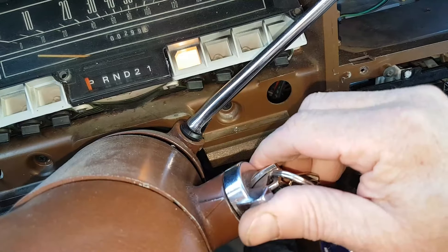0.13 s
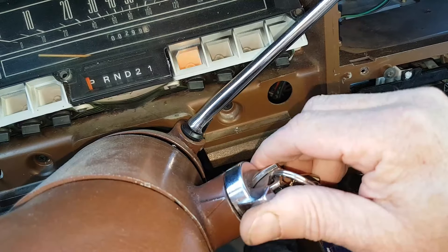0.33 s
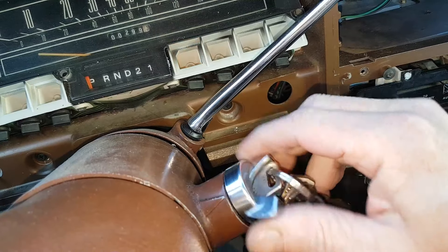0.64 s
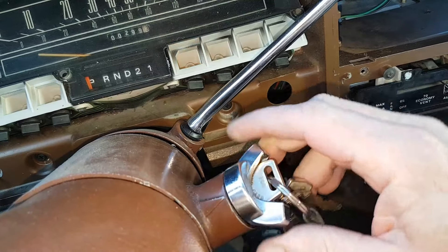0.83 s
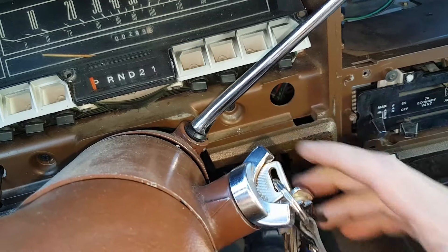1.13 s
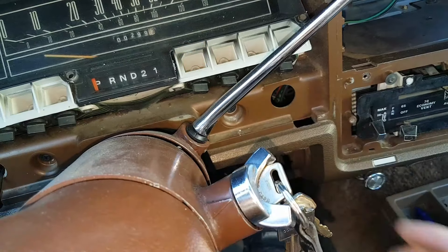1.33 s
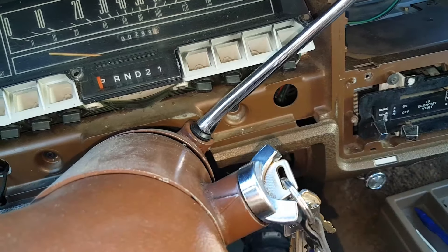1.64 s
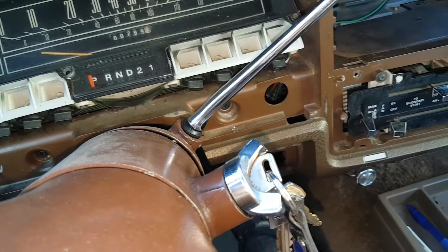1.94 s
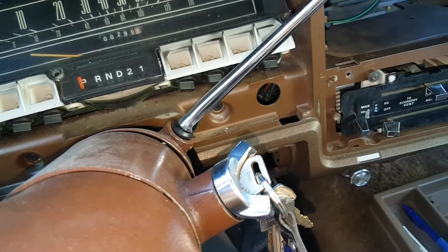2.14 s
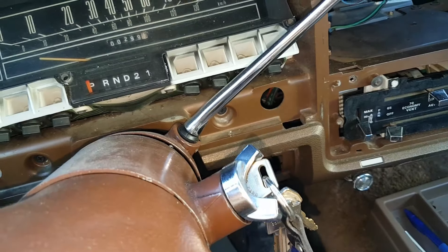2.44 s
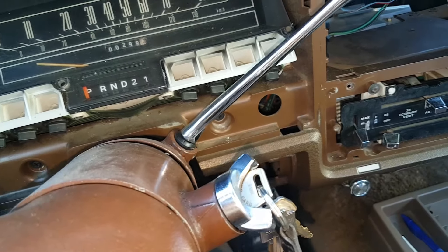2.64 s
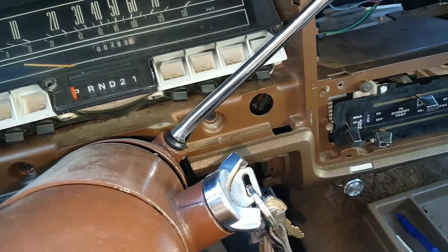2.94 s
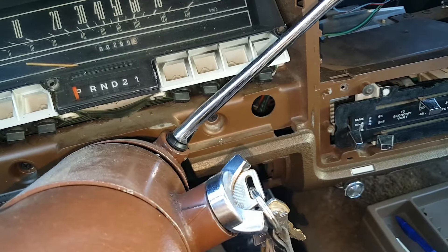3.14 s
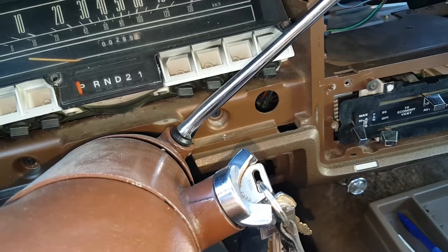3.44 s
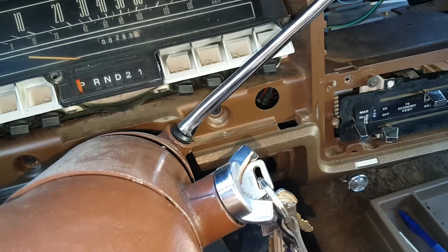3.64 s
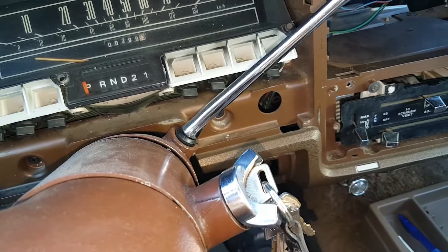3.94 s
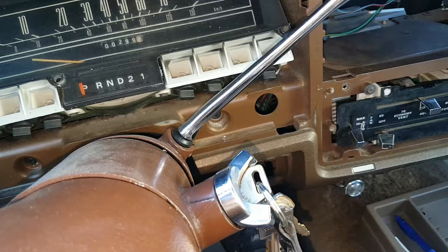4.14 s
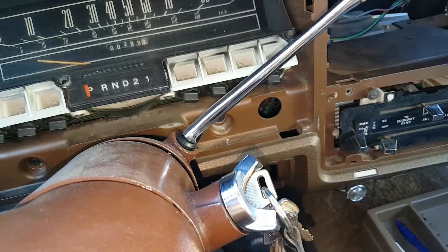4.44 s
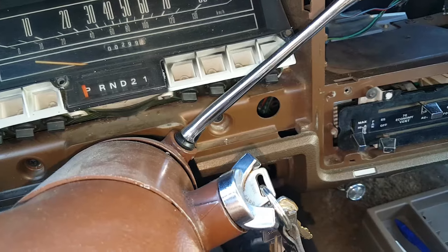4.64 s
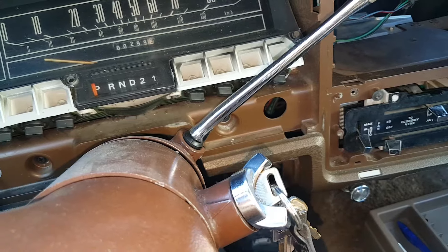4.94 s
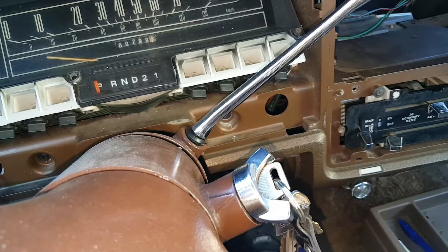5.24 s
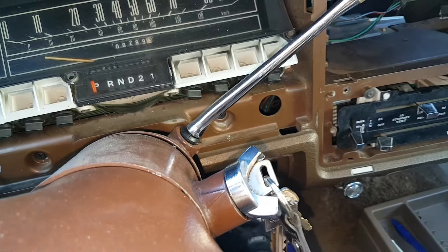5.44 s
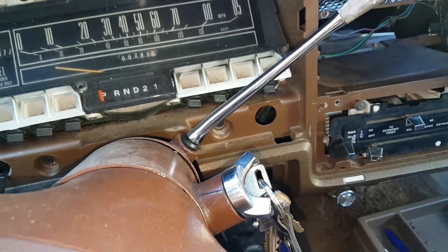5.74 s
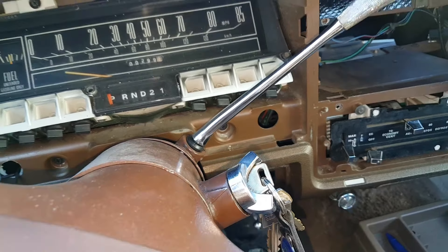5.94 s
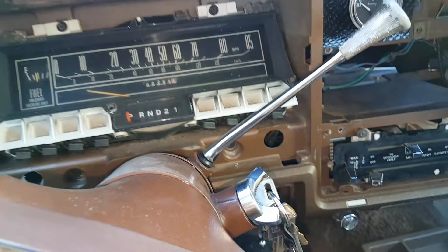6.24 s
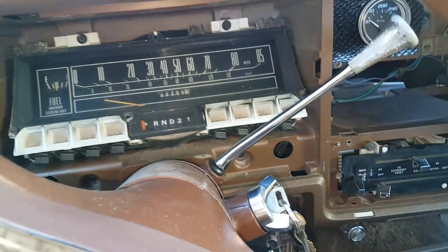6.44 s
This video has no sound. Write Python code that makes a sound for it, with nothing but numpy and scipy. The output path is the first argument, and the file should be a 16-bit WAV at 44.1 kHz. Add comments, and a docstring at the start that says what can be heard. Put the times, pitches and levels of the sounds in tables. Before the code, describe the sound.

Faint cabin air and hum, then a gear crash and grinding, whining starter. The large engine fires, the starter whirs down, and the revs flare and fall. Two throttle blips swell into low, booming growls, each dropping away, before a loping idle remains. Pedal creaks, metallic ticks and light rattles sit close to the stereo microphone inside the resonant car interior.

```python
"""A clunk and a grinding starter, then an old V8 catches, is blipped twice and settles into a loping idle.
Heard from the driver's seat: exhaust lines and uneven firing pulses boom through cabin resonances, shaped
noise makes the roar, the intake hiss and the gear grind, and short ringing bursts tick from pedal, keys and trim.
Faint air and an electric hum lie behind it all; two microphone ports hear it, the left one first."""
import sys
import numpy as np
from scipy.fft import rfft, irfft, next_fast_len
from scipy.io import wavfile
from scipy.ndimage import uniform_filter1d, map_coordinates

SR = 44100
rng = np.random.default_rng(int(sys.argv[2]) if len(sys.argv) > 2 else 0)


def wav_out(sig):
    """Save sig, one row per channel (or a flat mono array), as 16-bit PCM at SR to the path in sys.argv[1]."""
    wavfile.write(sys.argv[1], SR, np.round(np.clip(np.atleast_2d(sig).T, -1, 1) * 32767).astype(np.int16))


N = 291060  # length [samples]


def amp(db):
    """Gain of a level in dB."""
    return 10 ** (np.asarray(db) / 20)


def unit(x):
    """x at rms 1."""
    return x / np.sqrt(np.mean(x ** 2) + 1e-20)


def along(points, hz):
    """A curve through (Hz, value) points on a log frequency axis."""
    f, v = np.transpose(points)
    return np.interp(np.log(hz + 1), np.log(f + 1), v)


def curves(rows):
    """One value per sample for each column, and a gate that is open while the table runs."""
    s, *cols = np.transpose(rows)
    t = np.arange(N) / SR
    to_end = s[-1] - t + (s[-1] > t[-1] - .05)  # a table that lasts to the end does not close
    gate = np.clip(np.minimum(t - s[0], to_end) / .02, 0, 1)
    return np.array([np.interp(t, s, c) for c in cols]), gate


def wobble(rate):
    """A smooth random curve, rate knots a second."""
    coarse = np.arange(0, N + 32, 32)
    knots = rng.standard_normal(int(N * rate / SR) + 4)
    return np.interp(np.arange(N), coarse, map_coordinates(knots, [coarse * rate / SR]))


def swell(start, end, db, rise_s, fall_s):
    """A gain that holds db from start to end; it slopes 60 dB in rise_s before and in fall_s after."""
    t = np.arange(N) / SR
    return amp(db - 60 * np.clip(start - t, 0, None) / rise_s - 60 * np.clip(t - end, 0, None) / fall_s)


def filtered(x, response):
    """x times a complex response of frequency."""
    m = next_fast_len(N + SR // 2)
    return irfft(rfft(x, m) * response(np.fft.rfftfreq(m, 1 / SR)), m)[..., :N]


def modes(table):
    """Causal response of a set of resonances (Hz, width Hz, dB) of alternating sign."""
    def response(f):
        return sum((-1) ** k * amp(db) * 1j * f * w / (c * c - f * f + 1j * f * w)
                   for k, (c, w, db) in enumerate(table))
    return response


def noise(spectrum=None):
    """A pair of unrelated noises of rms 1, white or coloured."""
    pair = rng.standard_normal((2, N))
    return pair if spectrum is None else unit(filtered(pair, lambda hz: amp(along(spectrum, hz))))


def engine():
    """Firing rate and its acceleration drive the lines, fan, boom, roar and hiss; an air leak stays steady."""
    # the run of the engine: (time [s], firing rate [Hz], mechanical roar [dB before its final trim])
    run = [(0.5, 24.04, -45), (0.63, 30.83, -34.5), (0.69, 35, -29), (0.76, 40.55, -38), (0.88, 48, -35),
           (0.98, 49.1, -37.5), (1.1, 45.6, -37), (1.34, 32.65, -41), (1.5, 31.5, -42), (1.75, 26.5, -44.5),
           (2.0, 28, -41.5), (2.17, 33.8, -45.5), (2.28, 49.1, -37.5), (2.43, 90.5, -30.5),
           (2.55, 117.6, -29.5), (2.64, 131.1, -28), (2.71, 130.5, -26), (2.85, 111.5, -32.5),
           (3.0, 90.3, -35), (3.08, 83.8, -39.5), (3.38, 43.76, -43), (3.54, 35.07, -46),
           (3.68, 45.89, -42.5), (3.85, 88.78, -34), (3.96, 113.9, -30.5), (4.01, 118.8, -28.5),
           (4.09, 116.6, -30.5), (4.27, 91.66, -34.5), (4.38, 81, -37), (4.53, 61.9, -40.5),
           (4.7, 42.52, -43), (4.9, 32.92, -45), (5.1, 28.39, -47.5), (5.3, 26.46, -50), (5.76, 30.25, -43),
           (5.96, 34.8, -42.5), (6.2, 36.8, -42.5), (6.6, 33.44, -42)]
    # deep boom as the engine lopes: (time [s], level change [dB])
    lope = [(.68, 1.5), (1.3, 1), (1.53, -3), (1.62, 2), (1.77, -8), (2.04, 0), (2.1, -7), (2.2, 0),
            (2.8, 0), (2.86, -6), (2.95, 1), (3.21, -4), (3.32, 4), (3.42, -3), (3.62, 0), (4.02, 1),
            (4.08, -8), (4.13, 1), (4.19, -5), (4.29, 3), (4.43, -2), (4.69, 0), (4.73, -5), (4.85, 0),
            (5.26, 1), (5.31, -5), (5.5, 0), (6.13, 1), (6.17, -5), (6.3, 0), (6.6, 0)]
    full_pull_hz_per_s, pull_window_s = 209, 0.057  # acceleration that means an open throttle; averaging
    caught_s, catch_rise_s = 0.682, 0.56  # steady firing from here on; its rise over 60 dB
    (firing_hz, roar_db), running = curves(run)
    revved = np.clip((firing_hz - 45) / 60, 0, 1)
    acceleration = uniform_filter1d(np.gradient(firing_hz) * SR, round(pull_window_s * SR))
    pull = np.clip(acceleration / full_pull_hz_per_s, 0, 1)
    lope_db = curves(lope)[0][0]
    boom_level_db = boom_db(roar_db, pull, lope_db)
    fired = np.cumsum(firing_hz) / SR  # firings so far
    lines = exhaust_lines(firing_hz, fired, roar_db, pull, lope_db)
    fan = revved ** 2 * engine_line(2.87, -36, fired)  # cooling fan
    boom = firing_boom(firing_hz, fired, revved, boom_level_db)
    low = swell(caught_s, N / SR, 0, catch_rise_s, 1) * running * (lines + fan + boom)
    roar = mechanical_roar(fired, revved, roar_db)
    hiss = intake_hiss(roar_db, pull, revved)
    spread_low = np.array([low, 0.31 * running * np.roll(low, 900)])  # a weaker copy 20 ms later for width
    return spread_low + running * (amp(-1.5) * roar + hiss + air_leak())


def engine_line(k, db, fired):
    """A tone at k times the firing rate; no two firings burn alike, so its level and phase flutter."""
    gain = np.sqrt(2) * amp(db + 1.1 * min(k, 2) * wobble(18))  # the high ones flutter most
    return gain * np.sin(k * (2 * np.pi * fired + .13 * wobble(12)))


def exhaust_lines(firing_hz, fired, roar_db, pull, lope_db):
    """Multiples of the firing rate, and the fractions that uneven banks sound, pass into the cabin."""
    # lines of the exhaust: multiples of the firing rate [1]
    multiples = np.array([5.5, 5, 6, 7, 8, 9, 10, 11, 12, 13, 14, 15, 16, 19, 21, 24]) / 8
    # strength of each multiple at idle [dB before the path]
    idle_db = [-50, -44, -49, -51, -25, -48, -50, -48, -45, -48, -40, -40, -28, -32, -28, -27]
    # under open throttle and on the overrun: a row per blip, a column per multiple [dB before growth and path]
    open_db = [
        [-40, -25, -5.5, -28, -25, -11.5, -4, -24, -24, -28, -28, -28, -15, -32, -31.5, -30],
        [-6, -26, -24, -28, -16, -7, -22, -22, -28, -30, -28, -28, -16, -34, -31.5, -30],
    ]
    overrun_db = [
        [-40, -11, -28, -14, -14, -22, -24, -24, -26, -22, -26, -24, -15, -32, -32, -30],
        [-15, -24, -26, -7, -13, -19, -18, -24, -24, -22, -22, -22, -14.5, -32, -32, -30],
    ]
    # path of the lines into the cabin: (frequency [Hz], width [Hz], gain [dB])
    path = [(30.8, 7, -2), (80.5, 15, 0.5), (131, 20, -1.5), (173, 30, -4), (252, 48, -3)]
    second_blip_s, lines_grow = 3.55, 0.77  # growth off idle [dB per dB of roar]
    blip = (np.arange(N) / SR > second_blip_s).astype(int)
    off_idle = np.clip((firing_hz - 40) / 28 + 1.07 * pull, 0, 1)
    growth_db = lines_grow * (roar_db - roar_db.max())
    wide_open = np.transpose(open_db)[:, blip]
    shut_off = np.transpose(overrun_db)[:, blip]
    total = 0
    for k, idle, wide, shut in zip(multiples, idle_db, wide_open, shut_off):
        line_db = idle + off_idle * (shut + pull * (wide - shut) + growth_db - idle)
        # only lines between 30 and 150 Hz lope
        deep = np.clip(np.minimum(150 - k * firing_hz, k * firing_hz - 30) / 30, 0, 1)
        total = total + engine_line(k, line_db + lope_db * deep, fired)
    return filtered(total, modes(path))


def boom_db(roar_db, pull, lope_db):
    """The boom grows with the roar and the throttle, lopes, and wanders at random."""
    idle_db, grows, pull_db = -23.5, 0.61, 6  # base [dB]; dB per dB of roar; extra under throttle [dB]
    return idle_db + grows * (roar_db - roar_db[-1]) + pull_db * pull + lope_db + 2.1 * wobble(13)


def firing_boom(firing_hz, fired, revved, level_db):
    """One pulse a firing, of uneven strength, with a little noise excites the cabin resonances."""
    # strength of each firing in the cycle [dB]
    cylinders = [-6, 0, 2, -5.5, -6, -6.5, -5, -3.5]
    # cabin resonances: (frequency [Hz], width [Hz], gain [dB])
    cavity = [(24.4, 11.8, -10.5), (47.8, 11.8, -7.5), (78.8, 12.94, -1), (126, 44.7, -11),
              (164.5, 30.4, -13.5)]
    clean_db = 5  # firings even out at speed, so the boom drops
    at = np.flatnonzero(np.diff(np.floor(fired)))
    sizes = amp(np.resize(cylinders, len(at)) + 2.2 * rng.standard_normal(len(at)))
    pulses = np.zeros(N)
    # most of the even part is taken out: it already sounds in the lines
    pulses[at] = (sizes - 0.87 * sizes.mean()) / np.sqrt(firing_hz[at])
    ringing = unit(filtered(pulses + 0.0063 * noise()[0], modes(cavity)))
    return amp(level_db - 4.5 - clean_db * revved) * ringing


def mechanical_roar(fired, revved, roar_db):
    """Noise that swells once a firing, changes colour with speed and rings block and firewall."""
    # roar at low speed: (frequency [Hz], relative density [dB per Hz])
    slow_spectrum = [(110, -34), (180, 2), (193, -30.5), (225, 0), (381, -20.5), (754, -17), (879, -19),
                     (1760, -21.5), (5000, -40), (6500, -54), (11000, -120)]
    # roar at high speed: (frequency [Hz], relative density [dB per Hz])
    fast_spectrum = [(90, -30), (180, -3.5), (340, -3.5), (480, -16.5), (800, -14.5), (1120, -21),
                     (1690, -24), (5000, -47.5), (6500, -86), (11000, -120)]
    # engine block and firewall: (frequency [Hz], width [Hz], level over the roar [dB])
    block = [(770, 76, 3), (978, 56, 3), (1228, 28, 0.5), (1770, 245, -4.5), (2330, 41, 6), (3010, 65, 2.5)]
    puff = 1 + (.15 + .15 * revved) * np.cos(2 * np.pi * fired) * amp(3 * wobble(40))
    blend = np.sqrt(1 - revved) * noise(slow_spectrum) + amp(4.0) * np.sqrt(revved) * noise(fast_spectrum)
    flutter = amp(.8 * wobble(18))
    return filtered(amp(roar_db) * flutter * blend * puff,
                    lambda hz: 1 + abs(sum(modes([m])(hz) for m in block)))


def intake_hiss(roar_db, pull, revved):
    """Air noise with throttle resonances grows with the roar; a narrow whistle joins as the throttle opens."""
    # intake air: (frequency [Hz], relative density [dB per Hz])
    air_spectrum = [(2350, 9.5), (4000, 1), (4680, -11), (5250, 7), (5900, 4), (6780, 2), (7480, -9),
                    (8910, -2.5), (12000, 2), (15000, 0), (16000, -3)]
    # whistles of the intake: (frequency [Hz], width [Hz], gain [dB])
    throttle = [(1249, 42, 19.5), (6230, 1800, 0), (6900, 400, 4)]
    # the hiss swells: (from [s], to [s], gain [dB])
    gulps = [(0.75, 1.055, -58), (1.97, 2.1, -56), (2.304, 2.56, -45.5), (3.78, 3.93, -48),
             (5.75, 6.601, -61)]
    gulp_rise_s, gulp_fall_s = 0.48, 0.74  # over 60 dB
    hiss_db, hiss_grows = -60.5, 0.21  # base gain [dB]; dB per dB of roar
    whistle_db = -46  # at its strongest, as the throttle cracks open at low speed
    gain = amp(hiss_db + hiss_grows * (roar_db - roar_db[-1]))
    gain = gain + sum(swell(*g, gulp_rise_s, gulp_fall_s) for g in gulps)
    hiss = gain * amp(1.3 * wobble(30)) * (noise(air_spectrum) + filtered(noise(), modes(throttle)))
    whistle = unit(filtered(noise(), modes([(1253, 18, 0)])))
    return hiss + amp(whistle_db) * np.clip(2 * pull, 0, 1) * (1 - revved) ** 2 * whistle


def air_leak():
    """A steady fizz of escaping air, its spectrum rippled by hose echoes."""
    # leaking air: (frequency [Hz], relative density [dB per Hz])
    fizz = [(5290, -34), (9000, -6.5), (9650, -11.5), (10700, -5.5), (11500, -8), (13800, 1.5), (15600, -6),
            (16000, 0.5)]

    def hose(hz):
        return 1 + .25 * np.cos(2 * np.pi * hz * 0.0014) + 0.34 * np.cos(2 * np.pi * hz * 0.0043)
    return amp(-50.5) * filtered(noise(fizz), hose)


def starter():
    """The motor drones, gear teeth grind, the freewheel sizzles as the engine overtakes; then it whirs down."""
    # starter on, off [s]
    crank_s = (0.13, 0.735)
    # the pinion crashes into the ring gear: time [s], crash [dB], sizzle [dB], rise [s], fall [s] over 60 dB
    mesh_s, crash_db, spark_db, rise_s, fall_s = (0.15, -23, -36, 0.12, 0.11)
    # the released motor whirs down: from [s], to [s], level [dB], rise [s], fall [s] over 60 dB
    coast = (0.75, 1.05, -46.5, .05, 2)
    # resonances of the whir: (frequency [Hz], width [Hz], gain [dB])
    whir = [(1400, 60, -2), (1800, 250, 1.5), (2290, 250, -3)]
    on = swell(*crank_s, 0, 0.032, .06)
    drone = motor_drone()
    teeth = noise() * amp(1.1 * wobble(120))

    def broad(hz):
        return amp(-9.5) * (hz > 300) / (1 + (hz / 2500) ** 2)
    whine = gear_whine(teeth)
    grind = amp(-34.5) * unit(whine + filtered(teeth, broad))
    crash_gain = swell(mesh_s, mesh_s, crash_db, rise_s, fall_s)
    crash = crash_gain * unit(filtered(noise(), broad) + 0.15 * whine)
    sizzle = freewheel_sizzle(swell(mesh_s, mesh_s, spark_db, rise_s, fall_s))
    coasting = swell(*coast) * unit(filtered(teeth, modes(whir)))
    return coasting + on * (drone + grind + crash + sizzle)


def motor_drone():
    """Noise rings the starter mount and surges as the motor takes the load."""
    # starter mount: (frequency [Hz], width [Hz], gain [dB])
    housing = [(68, 18.5, -4), (145.4, 16.6, 1.5), (239.7, 22, -3)]
    # the drone surges under load: (time [s], gain [dB])
    heaves = [(0.15, -46), (0.19, -22.5), (0.26, -28), (0.3, -32.5), (0.4, -31), (0.7, -21)]
    heave_rise_s, heave_fall_s = 0.2, 0.15  # over 60 dB
    gain = amp(-36.5) + sum(swell(s, s, db, heave_rise_s, heave_fall_s) for s, db in heaves)
    ringing = unit(filtered(noise()[0], modes(housing))) * [[1.35], [.2]]
    # the load leaves the motor as the engine fires
    return gain * ringing * np.clip((.8 - np.arange(N) / SR) / 0.29, .1, 1)


def gear_whine(teeth):
    """Tooth noise rings the gear modes, which come and go; the whine wavers with the cranking speed."""
    # pinion and ring gear: (frequency [Hz], width [Hz], gain [dB])
    gears = [(797, 63, -4), (970, 71, -6), (1250, 40, -10), (1485, 40, -5), (1620, 40, -9), (1910, 35, -8),
             (2391, 32, 1.5), (2740, 40, -12), (3110, 50, -6), (3500, 22, -4)]
    waver_s = 0.0006  # how far the whine runs ahead and behind, rms scale
    whine = sum(amp(3.5 * wobble(17)) * filtered(teeth, modes([m])) for m in gears)
    read_at = np.arange(N) + waver_s * SR * wobble(9)
    return map_coordinates(whine, np.broadcast_arrays([[0], [1]], read_at), order=3)


def freewheel_sizzle(spark):
    """Fast-fluttering bright noise, at the pinion's crash and as the engine overtakes the starter."""
    # sizzle as the engine overtakes: (from [s], to [s], gain [dB])
    overtakes = [(0.454, 0.645, -42.5), (0.665, 0.71, -36.5)]
    # bright noise: (frequency [Hz], relative density [dB per Hz])
    sizzle_spectrum = [(2060, -42), (3500, 8), (3970, 3), (5090, -1.5), (6780, 1), (9380, -8.5),
                       (14300, -8), (16000, -52)]
    rise_s, fall_s = 0.056, 0.1  # over 60 dB
    gain = amp(-86.5) + spark + sum(swell(*f, rise_s, fall_s) for f in overtakes)
    return gain * amp(2.9 * wobble(93.1)) * noise(sizzle_spectrum)


def catch():
    """Each first firing is one low push that dies in the floor pan."""
    # first firings: (time [s], starting level [dB before onset and spread])
    pushes = [(0.529, -22), (.657, -16)]
    t = np.arange(N) / SR
    thump = np.zeros(N)
    for s, db in pushes:
        u = np.clip(t - s, 0, None)
        decay = amp(db - 60 * u / 0.26)
        thump += decay * np.sin(2 * np.pi * 58 * u) * (1 - np.exp(-u / 0.0034))
    return thump * [[1.35], [.1]]


def ticks():
    """Each tick is a short burst that rings the trim modes near its centre and jingles the keys."""
    # ticks of keys, pedal and trim: (time [s], level before trim [dB], centre [Hz], treble before trim [dB])
    knocks = [(0.142, -25, 1860, -7), (0.209, -49, 2000.0, 5), (0.548, -38, 800, -25),
              (0.568, -33, 1900.0, -32), (0.596, -30, 900, -20), (0.696, -36.5, 1890.0, 9),
              (0.734, -50.5, 830.0, 12), (0.769, -48.5, 760.0, 5), (0.971, -43.5, 1930, 5.5),
              (1.854, -43, 1196, -16), (1.934, -43, 2812, 0.5), (2.01, -43.5, 1833, -1),
              (2.088, -39, 2328, -0.5), (2.258, -34.5, 898, -22), (2.266, -40, 900, -25),
              (2.319, -32, 1210.0, -20), (3.426, -46, 2300, -8), (3.443, -43.5, 2197, -32),
              (3.582, -35, 2336, -3), (3.883, -39, 1005, 7.5), (4.879, -50, 3050, -12),
              (5.452, -50, 3015, -20), (5.752, -38.5, 1095, -23), (5.76, -41.5, 800, -23),
              (5.886, -53, 3000, -1.5), (5.925, -38, 761, -26.0), (5.953, -47.5, 1343, -22.5),
              (5.976, -38, 899.6, -34), (5.982, -37, 800, -34), (6.016, -40.5, 1300, -24),
              (6.039, -41, 998, -23), (6.047, -43, 800, -23), (6.075, -42.5, 1200, -24.0),
              (6.106, -43, 902, -25), (6.148, -48, 2996, -13), (6.417, -44.5, 2822, -27.0)]
    # what the ticks ring in: (frequency [Hz], width [Hz])
    parts = [(800, 290), (1150, 470), (1800, 190), (2100, 340), (2350, 430), (2720, 76), (3020, 165)]
    # bright ring of the key bunch: (frequency [Hz], width [Hz], gain [dB])
    keys = [(6200, 6700, -1), (10800, 1200, 2), (12040, 820, 4), (14300, 1500, 7.5)]
    crack_db, crack_s = 15, 0.004  # sharp start, gain before smoothing; its decay over 60 dB
    out, t = np.zeros((2, N + SR)), np.arange(SR // 10) / SR
    f = np.fft.rfftfreq(len(t), 1 / SR)
    for s, db, centre_hz, treble_db in knocks:
        # dull knocks shake all of the trim, small bright ticks one part
        near = [(hz, w, -.0065 * centre_hz * abs(np.log2(hz / centre_hz))) for hz, w in parts]
        burst = rng.standard_normal((2, 2, len(t))) * (1 - np.exp(-t / 0.00026))
        dying = burst * amp(-60 * t / 0.057)
        body = unit(irfft(rfft(dying[0]) * modes(near)(f), len(t)))
        bright = unit(irfft(rfft(dying[1]) * modes(keys)(f), len(t)))
        crack = amp(crack_db - 60 * t / crack_s) * uniform_filter1d(burst[0], size=6)
        tick = amp(db - 8.5) * (body + crack) + amp(db + treble_db - 11.5) * bright
        out[:, round(s * SR):][:, :len(t)] += tick
    return out[:, :N]


def trim():
    """Narrow noise makes a panel sing now and then; fluttering noise makes the pressed pedal creak."""
    # a panel that sings along at some engine speeds: frequency [Hz], width [Hz]
    panel = (772, 14)
    # when it sings: (from [s], to [s], level [dB])
    sings = [(0.74, 0.8, -47), (0.916, 0.98, -41), (1.107, 1.247, -46.5), (5.248, 5.553, -55),
             (5.8, 5.828, -51)]
    # the pedal rubs in its pivot: (frequency [Hz], width [Hz], gain [dB])
    creak = [(1830, 150, -1), (2350, 270, -3), (3950, 400, -6)]
    # pedal presses: (from [s], to [s], level [dB])
    presses = [(2.007, 2.092, -45.5), (3.43, 3.454, -52)]
    sing = sum(swell(*s, 0.37, 0.26) for s in sings) * unit(filtered(noise(), modes([(*panel, 0)])))
    slips = noise() * amp(4 * wobble(90))
    return sing + sum(swell(*p, .05, 0.17) for p in presses) * unit(filtered(slips, modes(creak)))


def cabin():
    """Faint air as wavering coloured noise, and an electric hum as a steady sine."""
    # cabin air: (frequency [Hz], relative density [dB per Hz])
    quiet = [(35, -50), (60, -29), (130, -11), (354, -5), (458, -9.5), (666, -5), (1820, -19), (2050, -10),
             (2410, -21), (5000, -28), (16000, -30)]
    # electric hum: (frequency [Hz], rms level [dB])
    hums = [(129.2, -52)]
    t = np.arange(N) / SR
    hum = sum(np.sqrt(2) * amp(db) * np.sin(2 * np.pi * hz * t) for hz, db in hums)
    return amp(-52.5 + 2 * wobble(17)) * noise(quiet) + hum * [[1], [0]]


def stereo(pair, lead_s):
    """Two signals are mixed to left and right by likeness; the sound reaches the left port first."""
    # likeness of the two ports: (frequency [Hz], correlation [1])
    alike = [(60, 0.9), (250, 0.91), (640, .75), (1500, 0.2), (6000, 0.2), (15000, 0.4)]
    # balance of the two ports: (frequency [Hz], left minus right [dB])
    tilt = [(60, 3.5), (150, 3), (380, 0), (950, 4), (2380, 5.5), (5980, -.5), (10000, 1), (15000, -4)]

    def ports(hz):
        turn = np.arccos(np.clip(along(alike, hz), -1, 1)) / 2
        return np.array([np.cos(turn), np.sin(turn)])

    def half(hz):
        return amp(along(tilt, hz) / 2) * np.exp(1j * np.pi * hz * lead_s)
    mid, side = filtered(pair, ports)
    left_right = np.array([mid + side, mid - side])
    return filtered(left_right, lambda hz: np.array([half(hz), 1 / half(hz)]))


def scene():
    """Everything as it reaches the two microphone ports."""
    sources = engine() + starter() + catch() + ticks() + trim() + cabin()
    return stereo(sources, lead_s=0.000265)


def record(dry):
    """Peaks bend smoothly towards full scale; then nothing is kept above the band limit."""
    top_hz = 15900
    limited = dry / (1 + np.abs(dry) ** 12) ** (1 / 12)
    return filtered(limited, lambda hz: hz < top_hz)


dry = scene()
out = record(dry)
wav_out(out)
```